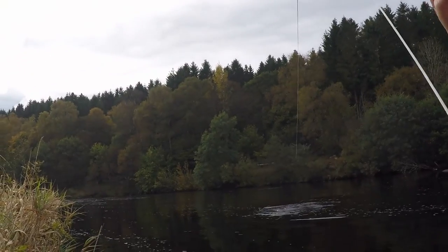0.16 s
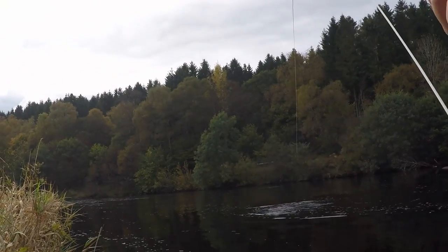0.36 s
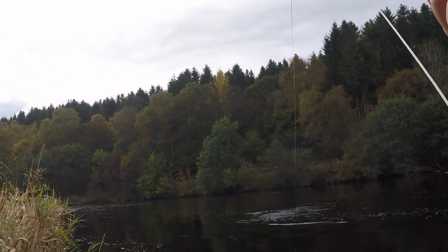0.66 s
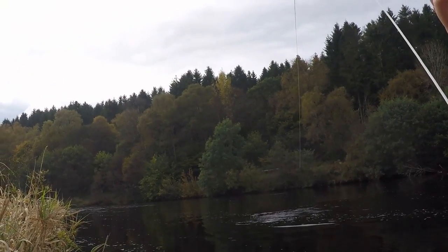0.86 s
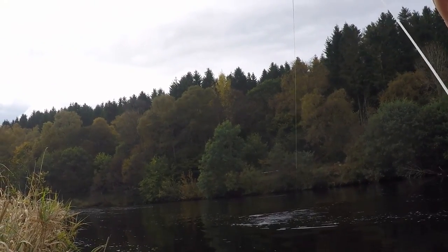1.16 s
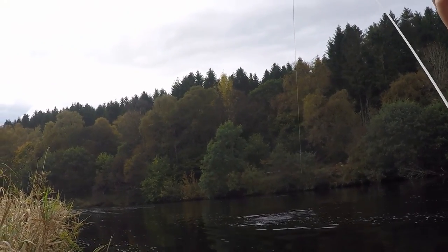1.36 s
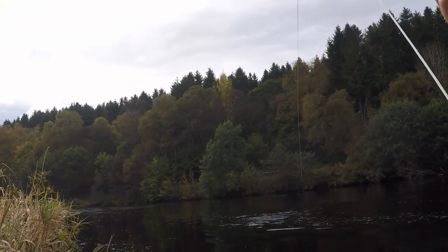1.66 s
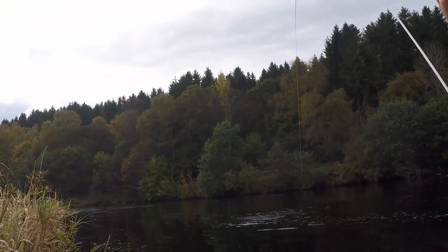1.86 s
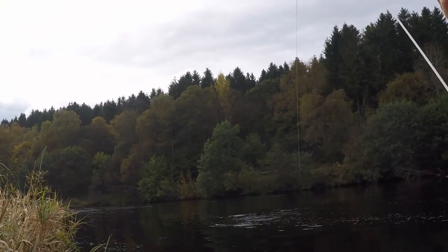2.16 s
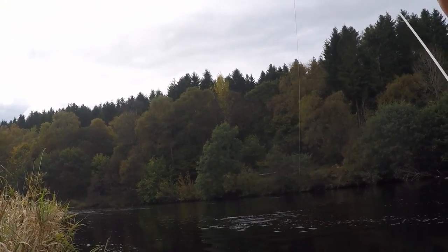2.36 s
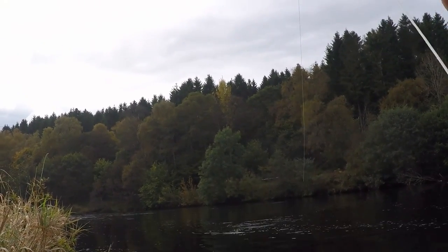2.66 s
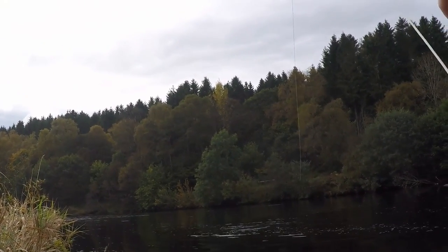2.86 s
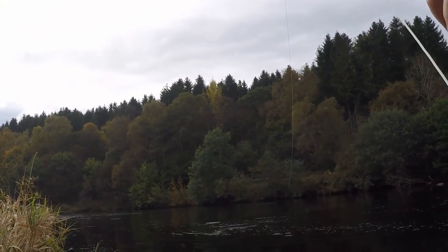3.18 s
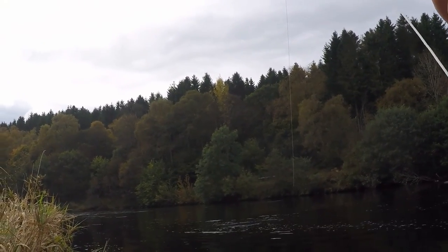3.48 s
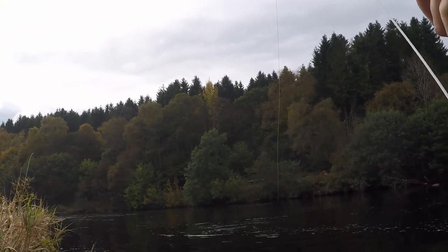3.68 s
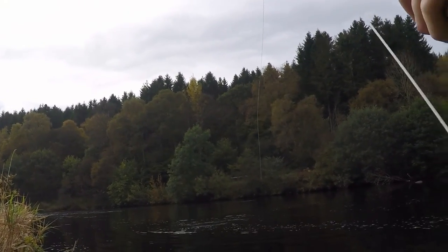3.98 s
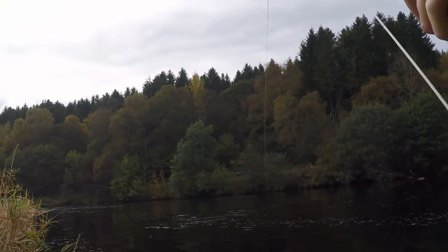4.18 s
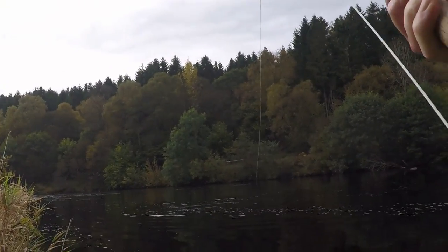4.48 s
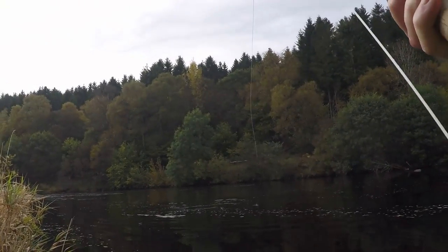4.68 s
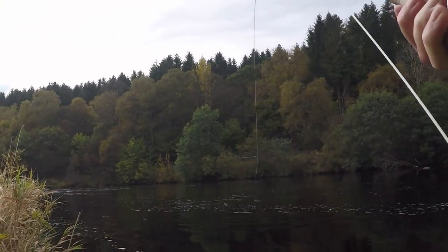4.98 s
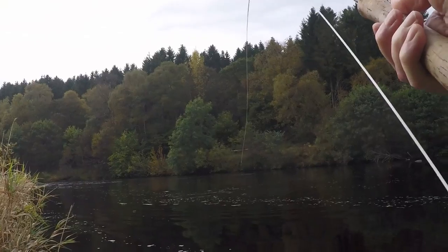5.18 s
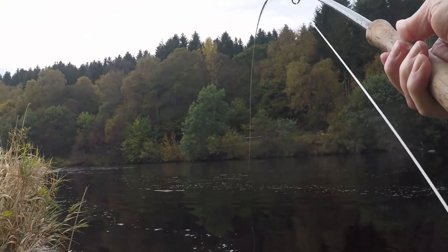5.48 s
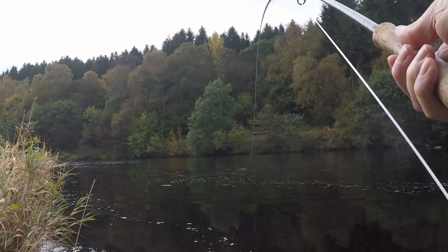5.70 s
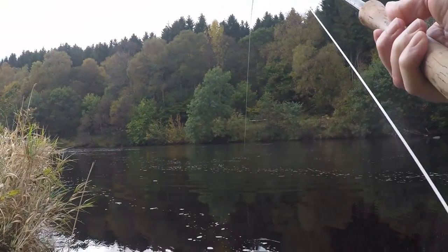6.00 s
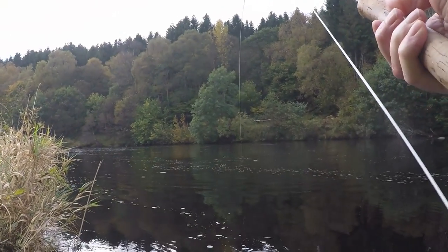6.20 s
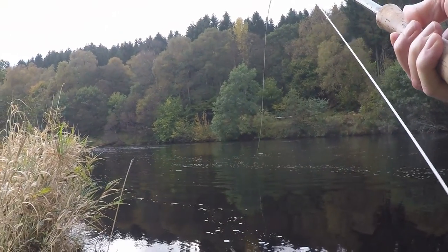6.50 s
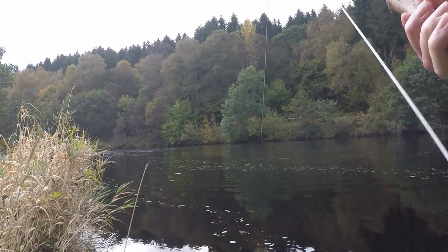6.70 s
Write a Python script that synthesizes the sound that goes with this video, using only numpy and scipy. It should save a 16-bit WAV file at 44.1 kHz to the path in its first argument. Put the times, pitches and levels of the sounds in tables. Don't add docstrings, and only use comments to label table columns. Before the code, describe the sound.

Close, bright reel clicks blur into a pulsing rasp as line runs out, is wound in, and runs again, with soft rod rumbles.

```python
import sys
import numpy as np
from scipy import signal
from scipy.fft import rfft, irfft, next_fast_len
from scipy.io import wavfile
from scipy.ndimage import uniform_filter1d, map_coordinates

SR = 44100
rng = np.random.default_rng(int(sys.argv[2]) if len(sys.argv) > 2 else 0)


def volts_from_decibels(level):
    exponent = np.asarray(level, float) / 20
    return 10 ** exponent


def store_wav(level_fs):
    pcm = np.round(np.clip(np.atleast_2d(level_fs), -1, 1) * 32767)
    wavfile.write(sys.argv[1], SR, pcm.T.astype(np.int16))


N = 302085


def unit(x):
    return x / np.sqrt(np.mean(np.abs(x) ** 2) + 1e-20)


def curves(rows, s):
    t, *columns = np.transpose(rows)
    return [np.interp(s, t, column) for column in columns]


def wobble(rate):
    knots = rng.standard_normal(int(N * rate / SR) + 4)
    return map_coordinates(knots, [np.arange(N) * rate / SR])


def noise(spectrum):
    m = next_fast_len(N)
    f, db = np.transpose(spectrum)
    log_f = np.log(np.fft.rfftfreq(m, 1 / SR) + 1)
    gain = volts_from_decibels(np.interp(log_f, np.log(f), db, -120, -120))
    return unit(irfft(rfft(rng.standard_normal(m)) * gain, m)[:N])


def add(x, s, sound):
    part = x[round(s * SR):][:len(sound)]
    part += sound[:len(part)]


def teeth(scatter):
    # [t/s, extra level/dB]
    creeping = [(0.0, 0), (3.0368, 1), (3.103, 0.5), (3.1527, 2), (3.199, 1.5), (3.2577, 1), (3.3176, -0.5),
                (3.6637, -1.5), (3.7058, -4), (4.6072, -4), (4.6395, -2.5), (5.6578, -0.5), (5.741, -1),
                (5.7846, -3), (5.8214, -2), (6.3705, -1.5), (6.4218, -0.5)]
    # [t/s, speed/(teeth per s)]
    steady_pull = [
        [(0.035, 63.6), (0.2, 66.0), (0.36, 153.0), (0.65, 102.7), (1.46, 27.7), (1.72, 107.4), (2.6, 35.3),
         (2.86, 44.9), (2.95, 19.4)],
        [(3.735, 10.0), (3.87, 47.9), (4.2, 92.7), (4.586, 10.0)],
        [(4.771, 28.4), (4.87, 27.4), (5.2, 27.8), (5.4, 10.0), (5.539, 10.0)],
        [(5.965, 25.2), (6.05, 120.6), (6.203, 88.9)],
        [(6.443, 72.1), (6.51, 66.0), (6.63, 152.1), (6.845, 39.5)],
    ]
    # [peak t/s, extra speed/(teeth per s), rise/s]
    spool_surges = [(0.146, 65.8, 0.072), (0.286, 62.6, 0.077), (0.454, 59.0, 0.066), (0.597, 56.8, 0.054),
                    (0.771, 72.8, 0.071), (0.922, 82.6, 0.081), (1.095, 70.3, 0.108), (1.343, 109.2, 0.127),
                    (1.576, 111.9, 0.097), (1.88, 59.9, 0.081), (2.127, 52.0, 0.112), (2.351, 26.5, 0.16),
                    (2.512, 53.3, 0.118), (3.793, 76.1, 0.077), (3.928, 51.5, 0.045), (4.061, 56.4, 0.052),
                    (4.164, 18.9, 0.026), (4.336, 43.6, 0.063), (4.403, 50.4, 0.028), (4.529, 92.1, 0.103),
                    (4.824, 52.5, 0.033), (4.985, 68.8, 0.118), (5.139, 34.7, 0.034), (5.259, 76.8, 0.138),
                    (5.461, 52.9, 0.099), (6.001, 66.7, 0.043), (6.173, 39.8, 0.059), (6.572, 106.9, 0.043),
                    (6.719, 96.9, 0.056), (6.831, 150.0, 0.057)]
    check_over_rise = 0.7
    teeth_per_push, first_push = 12, 4.3
    delay_s = 0.0008

    rows = [[(s, 0, db, 0) for s, db in creeping]]
    peak, extra, rise = np.transpose(spool_surges)[:, :, None]
    for burst in steady_pull:
        t = np.arange(burst[0][0], burst[-1][0] + 0.003, 1 / SR)
        width = np.where(t < peak, rise, check_over_rise * rise)
        inside = (peak > t[0]) & (peak < t[-1])
        bumps = inside * extra * np.exp(-((t - peak) / width) ** 2)
        speed = curves(burst, t)[0] + np.sum(bumps, axis=0)
        passed = np.cumsum(speed) / SR
        whole = np.arange(int(passed[-1]) + 1)
        s = np.interp(whole + scatter * rng.standard_normal(len(whole)), passed, t)
        surge = np.log2(speed / uniform_filter1d(speed, size=SR // 3))
        push = np.cos(2 * np.pi * (whole - first_push) / teeth_per_push)
        rows.append(np.c_[s + delay_s, np.interp(s, t, surge), 0 * s, push])
    return np.concatenate(rows).T


def pawl_chatter(count, t, rattle_s, spiky_db, wear, loose):
    landing = 0.16 * unit(np.arange(len(t)) == 14)
    shape = (count, len(t))
    fresh = rng.standard_normal(shape) * volts_from_decibels(spiky_db * rng.standard_normal(shape))
    alike = unit(uniform_filter1d(fresh, size=15, axis=0))
    chatter = landing + wear * alike + loose * unit(fresh)
    dying = np.exp(-(t / rattle_s) ** 1.79) + 0.85 * np.exp(-t / 0.00033)
    chatter *= dying * (1 - np.exp(-t / 0.00009))
    return chatter / np.linalg.norm(chatter, axis=1, keepdims=True)


def ratchet(times, levels, main_db, modes, rattle_s, spiky_db, vary_db, wear, loose):
    main_rings = [2575, 5500, 9500]
    seat_db, firmness = 6.5, 0.75

    t = np.arange(400) / SR
    chatter = pawl_chatter(len(times), t, rattle_s, spiky_db, wear, loose)
    shove = np.exp(-t / 0.00012)
    firm = chatter + firmness * shove / np.linalg.norm(shove)
    at = (np.round(times * SR).astype(int)[:, None] + np.arange(len(t))).ravel()

    m = next_fast_len(N + SR // 4)
    f = np.fft.rfftfreq(m, 1 / SR)
    hz, width, db = np.transpose(modes)
    low = hz < 2200
    seat = (1400 < hz) & (hz < 1700)
    width = np.where(seat, width, np.maximum(width, hz / 26))
    part = (hz < 7500).astype(int) + (hz < 4200)
    damping = 1j * f * width[:, None]
    bells = volts_from_decibels(db)[:, None] * damping / (hz[:, None] ** 2 - f * f + damping)
    sign = (-1) ** (np.arange(len(hz)) + (hz > 3100))

    tones = np.exp(-2j * np.pi * np.outer(t, hz))
    drawn = np.abs(np.where(low, firm @ tones, chatter @ tones))
    luck = vary_db * rng.standard_normal((len(times), len(hz))) - 12 * np.log10(0.3 + drawn)
    nearest_main = np.abs(np.subtract.outer(hz, main_rings)).argmin(axis=0)
    total = 0
    for k, bell in enumerate(bells):
        part_size = np.sqrt(np.mean(np.abs(bells[part == part[k]]) ** 2, axis=1).sum())
        size = volts_from_decibels(levels[part[k]] + luck[:, k])
        size *= volts_from_decibels(seat_db * seat[k] + (nearest_main == k) @ main_db)
        blows = size[:, None] * (firm if low[k] else chatter)
        total = total + sign[k] * bell / part_size * rfft(np.bincount(at, blows.ravel()), m)
    return irfft(total, m)[:N]


def reel():
    winding = (3.5, 6.3)
    # [f/Hz, width/Hz, level/dB]
    running_rings = [(590, 23, -17.5), (1350, 310, -13), (1585, 38, -3), (1914, 37, -3), (2154, 30, -5),
                     (2606, 128, 6.5), (3450, 324, -5), (4810, 73, -7.5), (5630, 141, -6),
                     (6870, 218, -8.5), (7536, 120, -8), (8110, 246, -5), (9520, 340, -1),
                     (10810, 220, -8.5), (12100, 210, -13.5), (15010, 6600, -19.5)]
    # [f/Hz, width/Hz, level/dB]
    winding_rings = [(1400, 590, -24), (1805, 127, -5), (2600, 128, 4), (3880, 710, -7.5), (4655, 160, -1),
                     (5496, 390, 3.5), (7080, 300, 1.5), (7280, 590, -5), (8160, 250, -2), (9440, 540, 1),
                     (10960, 500, -1.5), (11900, 3900, -9), (14000, 4500, -10)]
    # [t/s, nearness/dB, pawl side turned to the camera/dB]
    reel_held = [(0, 0.5, 2), (.3, -0.5, -1), (.6, 0.5, -2), (.9, 0, 2), (1.3, -0.5, 1.5), (2.1, -1, 2.5),
                 (2.5, -1, 1.5), (2.7, -2.5, -0.5), (3.0, -0.5, 0), (3.7, -5, -2), (4.1, -4.5, -0.5),
                 (4.7, -5, -2), (5.4, -6.5, -2), (5.75, -2.5, -6.5), (6.0, 0, -2), (6.2, 2, 1.5),
                 (6.4, 0, 1), (6.85, 1.5, 0)]
    push_share = [0.22, 0.4, 0.98]
    # snap in dB, and gain per dB of facing
    snap_db, facing = [-6, -7.5, -12.5], [0.91, -0.56, -0.26]
    out_surge_db, in_surge_db = [0.5, -0.5, 2], [-3, 0.5, 2]
    # extra level in dB, and dB gained when a surge doubles the speed
    main_extra_db, main_surge_db = [-0.5, 0.5], [0, 0.5]
    push_db = 4

    times, surge, extra_db, push = teeth(scatter=0.012)
    inward = (times > winding[0]) & (times < winding[1])
    outward = ~inward
    near_db, facing_db = curves(reel_held, times)
    levels = np.add.outer(snap_db, near_db + extra_db) + np.outer(facing, facing_db)
    levels += surge * np.where(inward, np.c_[in_surge_db], np.c_[out_surge_db])
    main_db = np.take(main_extra_db, inward) + surge * np.take(main_surge_db, inward)
    leaning = push_db * push * inward * (times < winding[1] - 0.5)
    main_db = main_db + np.outer(push_share, leaning)
    running = ratchet(times[outward], levels[:, outward], main_db[:, outward], running_rings,
                      rattle_s=0.0039, spiky_db=2, vary_db=2.5, wear=1.0, loose=0.85)
    wound = ratchet(times[inward], levels[:, inward], main_db[:, inward], winding_rings,
                    rattle_s=0.0042, spiky_db=2, vary_db=1.9, wear=0.64, loose=0.65)
    return running + wound


def scatter_off_body(x):
    t = np.arange(SR // 16) / SR
    tail = rng.standard_normal(len(t)) * volts_from_decibels(-60 * t / 0.036) * (1 - np.exp(-t / 0.003))
    return x + volts_from_decibels(-18.5) * signal.fftconvolve(x, tail / np.linalg.norm(tail))[:N]


def river():
    # [f/Hz, level/dB]
    water_colour = [(88, -34.5), (150, 10), (335, 0), (812, -9), (988, -42), (1460, -34.5), (1750, -5.5),
                    (3270, -11.5), (5670, -11), (14800, -25.5), (16400, -72)]
    return volts_from_decibels(-60.5) * noise(water_colour)


def hand_rumble():
    # [t/s, grip effort/dB]
    grip_effort = [(0.0, -47), (0.6, -35), (1.16, -49.5), (3.08, -50), (3.52, -44.5), (3.59, -34),
                   (3.7, -41), (4.08, -33.5), (4.28, -30.5), (4.35, -38.5), (4.5, -27.5), (4.74, -40.5),
                   (5.19, -32.5), (5.63, -43.5), (6.11, -40.5), (6.18, -35), (6.33, -43), (6.85, -44)]
    # [f/Hz, level/dB]
    rumble_colour = [(7.1, 4.5), (12, 3), (38, 0.5), (51, 2.5), (70, -23.5), (91, -57), (150, -120)]
    # [f/Hz, level/dB]
    shudder_colour = [(35, -42), (60, -7.5), (81, -11.5), (123, -13.5), (167, -24.5), (300, -31),
                      (390, -68), (660, -120)]
    rumble_db, = curves(grip_effort, np.arange(N) / SR)
    shudder_db = -50 + 1.14 * (rumble_db + 40)
    rumble = volts_from_decibels(rumble_db - 0.5) * noise(rumble_colour)
    return rumble + volts_from_decibels(shudder_db - 1.5 + 2.54 * wobble(25)) * noise(shudder_colour)


def sleeve():
    # [t/s, length/s, level/dB]
    strokes = [(0.07, 2.45, -60), (2.547, 0.38, -66.5), (3.416, 0.046, -56.5), (3.525, 0.031, -50),
               (3.581, 0.01, -44), (3.623, 0.32, -57), (3.937, 0.021, -49), (3.98, 0.598, -51),
               (4.18, 0.04, -50.5), (4.609, 0.05, -54.5), (4.811, 0.705, -56.5), (5.114, 0.081, -51.5),
               (5.77, 0.095, -59.5), (5.966, 0.29, -56), (6.11, 0.026, -55), (6.47, 0.39, -57)]
    # [f/Hz, level/dB]
    cloth_colour = [(200, -30), (300, -15), (600, -11), (950, -9), (1200, -3), (1500, -9), (1800, -5),
                    (2150, -13), (2600, -7), (2950, -10), (3500, -25), (5500, -36), (9000, -52)]
    attack_db_per_s, release_db_per_s, rest_db = 410, 330, -71
    t = np.arange(N) / SR
    power = volts_from_decibels(2 * rest_db)
    for s, length, db in strokes:
        before = attack_db_per_s * np.maximum(s - t, 0)
        after = release_db_per_s * np.maximum(t - s - length, 0)
        power = power + volts_from_decibels(2 * (db - before - after))
    grain = volts_from_decibels(2.5 * wobble(150) + 1.2 * wobble(25))
    return volts_from_decibels(8.0) * np.sqrt(power) * unit(grain * noise(cloth_colour))


def rod_jolts():
    # [t/s, peak level/dB, f/Hz,
    # knock level/dB]
    rod_pulls = [(0.181, -26, 38, -10.5), (0.347, -25, 36.3, -4), (0.639, -19.5, 34.8, -9),
                 (0.815, -20.5, 35.3, -9), (0.991, -25, 38.7, -4.5), (1.169, -26, 38.8, -12),
                 (1.379, -27, 35.5, -7.5), (1.599, -41, 36.5, -4.5), (1.794, -29, 36.4, -12.5),
                 (1.963, -29.5, 35.6, -26), (2.173, -29, 36.1, -15), (2.431, -37, 39.2, -37),
                 (2.635, -36, 34.6, -29), (2.756, -35, 35.6, -21), (2.89, -39.5, 37.5, -26),
                 (0.485, -18, 29.7, -13), (3.269, -32.5, 29, -15), (3.584, -30, 31.5, -9),
                 (4.06, -28, 30, -26), (5.133, -21, 30.8, -15), (5.225, -36, 29.5, -9),
                 (6.168, -21.5, 30.8, -19), (6.613, -30, 29.5, -9), (6.769, -28.5, 29.1, -9)]
    hold_s = 0.21
    x, t = np.zeros(N), np.arange(SR // 3) / SR
    fade = volts_from_decibels(-60 * (t / hold_s) ** 3.34 - 55 * t)
    knock_turns = 105 * t + 0.09 * (1 - np.exp(-t / 0.0024))
    knock = np.sin(2 * np.pi * knock_turns) * (1 - np.exp(-t / 0.0063))
    for s, db, hz, knock_db in rod_pulls:
        sag = hz * (t + 0.017 * (1 - np.exp(-t / 0.014)))
        swing = np.sin(2 * np.pi * sag) * (1 - np.exp(-t / 0.011)) * fade
        add(x, s, volts_from_decibels(db - 3) * (swing + volts_from_decibels(knock_db + 11.5 - 60 * t / 0.062) * knock))
    return x


def drips():
    # [t/s, peak level/dB, f/Hz]
    bubbles = [
        (2.9785, -53, 1140),
        (3.013, -53, 1120),
    ]
    x, t = np.zeros(N), np.arange(1600) / SR
    for s, db, hz in bubbles:
        swell = volts_from_decibels(db + 7 - 60 * t / 0.051) * (1 - np.exp(-t / 0.005))
        add(x, s, swell * np.sin(2 * np.pi * hz * (0.92 * t + 4 * t * t)))
    return x


def handle():
    # [t/s, peak level/dB, f/Hz]
    handle_taps = [(4.354, -21, 1940), (4.603, -13, 1930), (3.582, -27.5, 1150), (3.948, -40, 1170),
                   (4.114, -38, 1140), (4.239, -29.5, 1040), (5.169, -36, 1190)]
    x, t = np.zeros(N), np.arange(400) / SR
    for s, db, hz in handle_taps:
        ring = np.sin(2 * np.pi * hz * t) * volts_from_decibels(db - 60 * t / 0.007) * (1 - np.exp(-t / 0.0004))
        body = volts_from_decibels(db - 22 - 60 * t / 0.044) * np.sin(2 * np.pi * 720 * t)
        add(x, s, body)
        add(x, s, 2.2 * ring)
        add(x, s + 0.00076, 3 * ring)
    return x


def scene():
    close = scatter_off_body(reel()) + river() + sleeve() + drips() + handle()
    trace = volts_from_decibels(-22) * close * np.maximum(wobble(12) - 1.1, 0)
    return close + hand_rumble() + rod_jolts() + np.array([trace, -trace])


def top_cut(x):
    return signal.sosfilt(signal.butter(12, 16510, fs=SR, output="sos"), x)


def record(dry):
    top_hz = 14900
    f = np.fft.rfftfreq(N, 1 / SR)
    heard = irfft(rfft(dry) / np.sqrt(1 + (f / top_hz) ** 60), N)
    return top_cut(heard)


dry = scene()
out = record(dry)
store_wav(out)
```